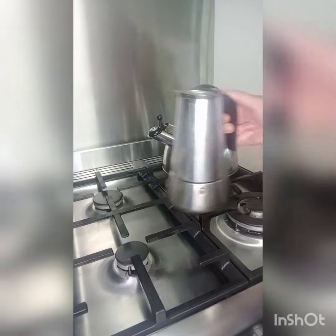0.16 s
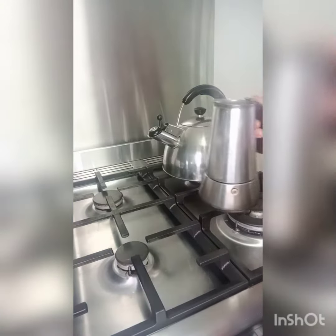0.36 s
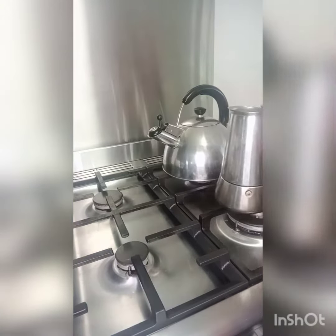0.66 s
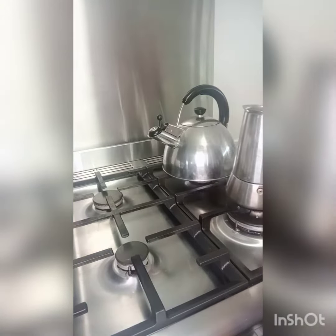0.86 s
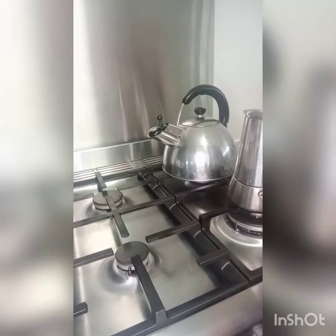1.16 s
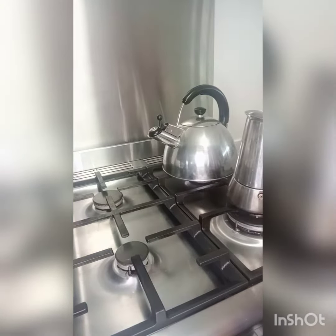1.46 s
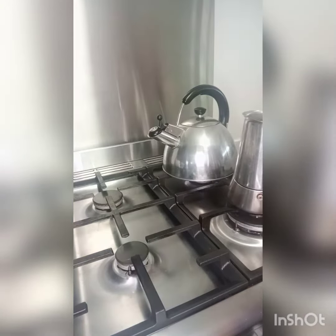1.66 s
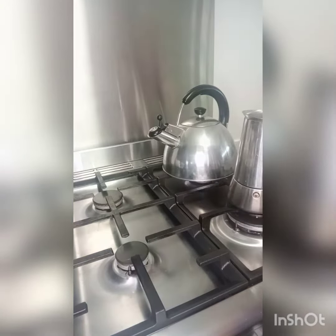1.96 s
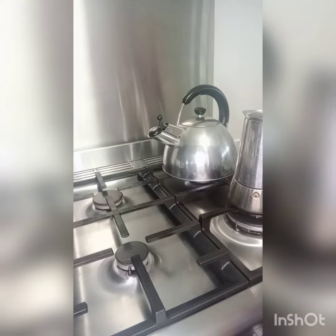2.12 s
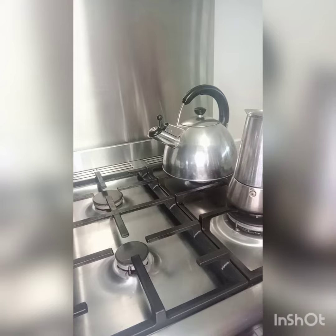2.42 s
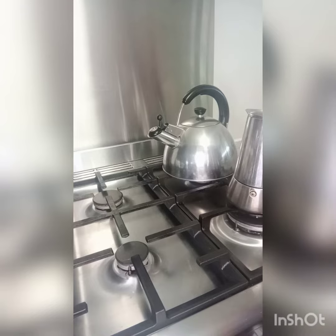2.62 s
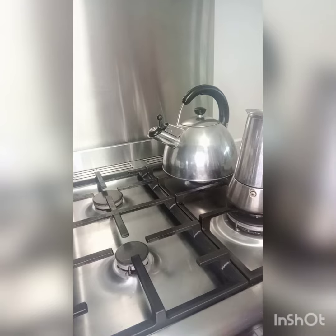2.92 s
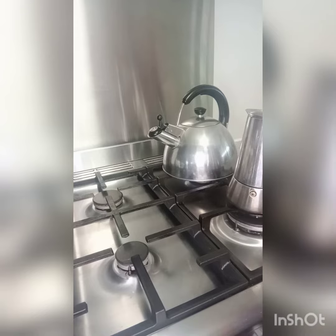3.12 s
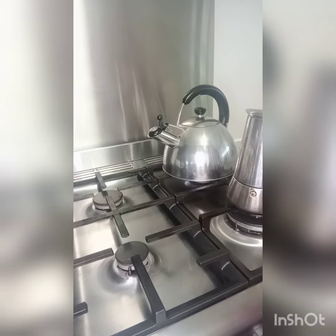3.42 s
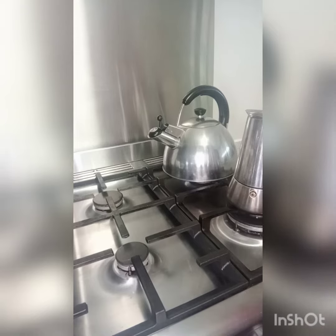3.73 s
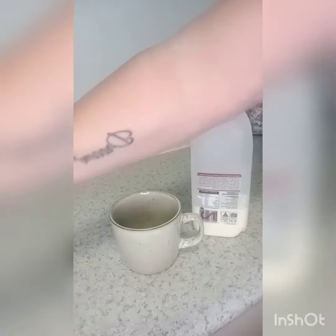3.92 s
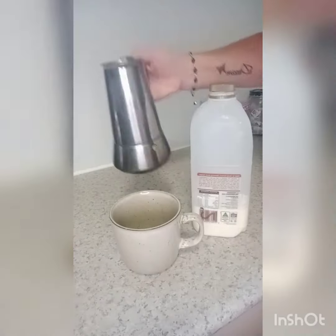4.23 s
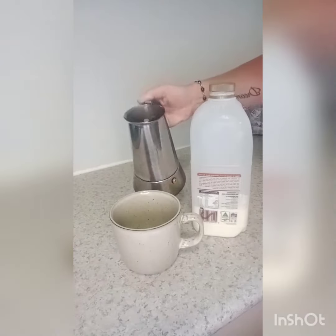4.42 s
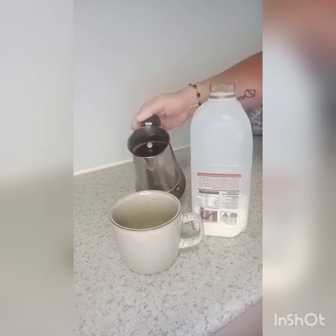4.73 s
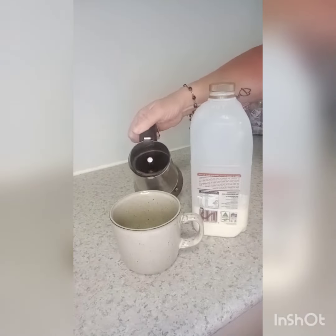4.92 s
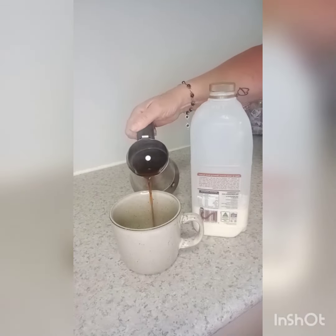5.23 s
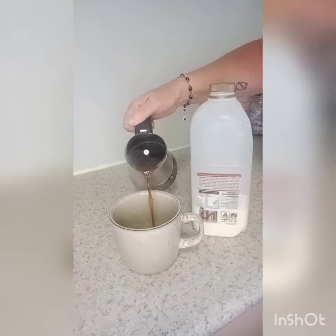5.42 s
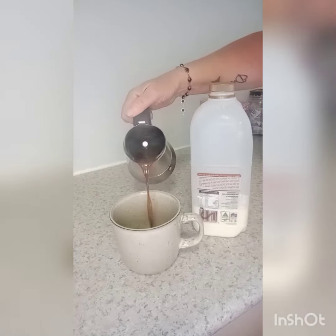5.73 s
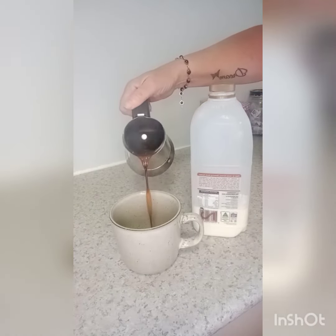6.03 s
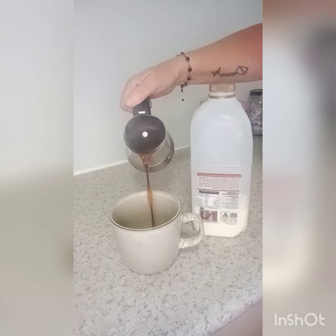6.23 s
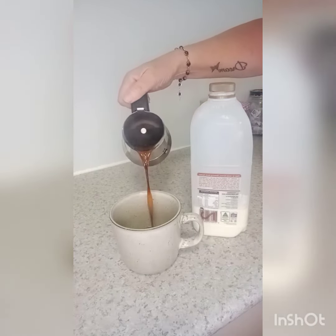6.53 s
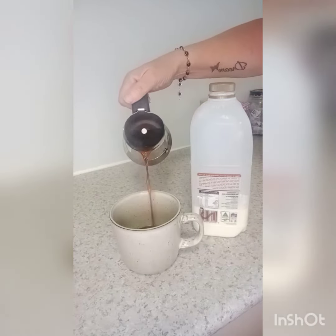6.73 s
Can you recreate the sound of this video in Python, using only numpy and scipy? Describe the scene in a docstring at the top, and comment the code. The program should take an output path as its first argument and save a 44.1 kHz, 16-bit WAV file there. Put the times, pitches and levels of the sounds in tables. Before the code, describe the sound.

From the start, a steel stovetop coffee pot gurgles and sputters close by, spitting several times a second over fine fizzing and low, hollow gulps. Its base knocks lightly on the stove grate several times in the first two seconds, with a short ringing clank near 0.9 seconds. At about 3.75 seconds the sound drops out for an instant, then the pot lifts off with a knock and a brief metallic scrape. The boiling collapses, leaving weak sputters and a couple of very faint tinkles until about 5.2 seconds. At 5.3 seconds a thin stream of coffee patters onto the bottom of a ceramic mug. From around 5.8 seconds it turns into louder, rounded plops and bubbling with small drip ticks, sinking slightly in pitch, and stops near 6.8 seconds. A faint hiss runs underneath, with the short echo of a small kitchen.

```python
"""Moka pot brewing and pouring

Steam spits through the coffee in the top of a steel moka pot while the boiler gulps below.
The pot knocks on the stove grate, then is lifted and carried, still sputtering, to a ceramic mug.
A thin stream patters on the bare bottom, then plops into the rising coffee. Most sounds start as
clicks that ring bubbles, trapped air, steel or the mug. A faint hiss runs underneath."""
import sys
import numpy as np
from scipy import signal
from scipy.fft import rfft, irfft, next_fast_len
from scipy.io import wavfile
from scipy.ndimage import uniform_filter1d

SR = 44100
rng = np.random.default_rng(int(sys.argv[2]) if len(sys.argv) > 2 else 0)


def master(y):
    """Save y as 16-bit WAV."""
    cut = np.clip(np.atleast_2d(y).T, -1, 1)
    pcm = np.round(cut * 32767)  # scale
    wavfile.write(sys.argv[1], SR, pcm.astype(np.int16))


N = 302967
TIME = np.arange(N) / SR
BURST_SIZE = SR // 4   # samples set aside for one short sound

# The tones at which things ring. Each row: pitch in Hz, width in Hz, relative level in dB.
# A narrower tone rings for longer.
CHAMBER_TONES = [(724, 144, -13.5), (853, 37, -3), (976, 213, -8.5), (1199.7, 46, 1.5), (1244, 31, 8),
                 (1322, 50, 3), (1461, 36, -0.5), (1684, 84, 0.5), (1833, 62, 0), (2115, 110, -1.5),
                 (2296, 68, -1.5), (2522, 100, -4)]   # air in the top of the pot
BOILER_TONES = [(127.8, 23, -1), (262, 52.3, 4.5), (312.6, 64, 0.5), (390.6, 45, 0.5), (541, 82, -6.5),
                (827, 63, -3.5)]   # the boiler and its funnel
STEEL_TONES = [(2440, 340, 20.5), (2780, 43, -1.5), (3650, 37, 10), (4070, 18, 2.5), (5070, 9, -5),
               (5800, 83, 9), (6640, 100, 1), (8660, 36, -4.5), (8100, 23000, -7.5)]   # the steel pot on the iron grate
MUG_AIR_TONES = [(677, 270, -22), (775, 56, 0), (934, 62, 2.5), (953, 130, -5.5), (1263, 79, 3.5),
                 (1460, 66, -11)]   # air in the mug
MUG_WALL_TONES = [(1220, 69, -1), (2235, 160, 4), (2493, 107, 8.5), (2777, 60, 3.5), (3216, 150, -3),
                  (3910, 220, -6), (4800, 290, -8.5), (5680, 125, -5.5), (6480, 89, -11), (7220, 850, -11),
                  (10200, 1900, -16)]   # the mug's wall and the higher tones of its air


def amp(db):
    """Turn decibels into a number to multiply by."""
    return 10 ** (np.asarray(db) / 20)


def rms_one(x):
    """Scale a sound so its average level (rms) is 1."""
    return x / np.sqrt(np.mean(x ** 2) + 1e-20)


def at_level(sound, db, length):
    """Scale a sound so its first `length` seconds have this average level."""
    return amp(db) * sound / np.sqrt(np.mean(sound[:max(int(length * SR), 64)] ** 2) + 1e-20)


def steady(x, window_s):
    """Even out slow swells but keep the fine crackle."""
    power = uniform_filter1d(x ** 2, max(int(window_s * SR), 64))
    return x / np.sqrt(np.abs(power) + 1e-20)


def curve(points, at=TIME):
    """Join (time, value) points with straight lines."""
    return np.interp(at, *np.transpose(points))


def wander(per_s):
    """A curve that drifts to a new random value per_s times a second."""
    values = rng.standard_normal(1000)
    return np.interp(TIME * per_s, np.arange(len(values)), values)


def add(out, s, sound):
    """Mix a sound in, starting at s seconds."""
    at = max(round(s * SR), 0)
    out[at:at + len(sound)] += sound[:N - at]


def shaped_noise(spectrum):
    """Noise whose balance of low and high follows (Hz, dB) points."""
    hz, db = np.transpose(spectrum)
    size = next_fast_len(N)
    bin_hz = np.arange(size // 2 + 1) * SR / size + 1
    gain = amp(np.interp(np.log(bin_hz), np.log(hz), db))
    return rms_one(irfft(rfft(rng.standard_normal(N), size) * gain, size)[:N])


def resonate(x, hz, width):
    """Let a sound ring at one pitch; width is in Hz."""
    r = np.exp(-np.pi * width / SR)
    feedback = [1, -2 * r * np.cos(2 * np.pi * hz / SR), r * r]
    return signal.lfilter(np.array([1, 0, -1]) * (1 - r * r) / 2, feedback, x + 1e-18)


def body(x, tones):
    """Ring all the tones of an object, flipping every second one upside down."""
    return sum((-1) ** k * amp(db) * resonate(x, hz, width) for k, (hz, width, db) in enumerate(tones))


def muffle(x, edge_hz, order):
    """Soften everything above edge_hz; a higher order cuts more steeply."""
    return signal.sosfilt(signal.butter(order, edge_hz, fs=SR, output="sos"), x)


def cut_lows(x, edge_hz):
    """Soften everything below edge_hz."""
    return signal.sosfilt(signal.butter(2, edge_hz, "high", fs=SR, output="sos"), x)


def pops(size, per_s, spread_db):
    """Random clicks; a few stand out as louder (positive spread) or softer (negative)."""
    strength = amp(spread_db * np.minimum(rng.exponential(1, size), 4))
    return (rng.random(size) < per_s / SR) * strength * rng.choice([-1, 1], size)


def cluster(length, per_s, first, tail_s):
    """One click of strength `first`, a flurry for `length` seconds, then fading stragglers."""
    t = np.arange(BURST_SIZE) / SR
    clicks = pops(BURST_SIZE, per_s, spread_db=-5) * np.exp(-np.maximum(t - length, 0) / tail_s)
    clicks[0] = first
    return clicks


def bubbles(clicks, hz, scatter, q, rise):
    """Each click frees a bubble that rings for about q cycles; `rise` lifts its pitch as it surfaces."""
    at = np.flatnonzero(np.abs(clicks) > amp(-40))
    pitch = (hz * np.exp(scatter * np.clip(rng.standard_normal(len(clicks)), -2, 2)))[at, None]
    age = np.arange(int(5.8 * q * SR / np.median(pitch)))
    decay = np.pi * pitch / q * age / SR
    fade_out = 1 - (age / len(age)) ** 2
    rings = clicks[at, None] * np.exp(-decay) * np.sin(2 * q * decay * (1 + rise * decay)) * fade_out
    return np.bincount((at[:, None] + age).ravel(), rings.ravel(), len(clicks))[:len(clicks)]


def fizz(tones, per_s, spread_db, patchy_db):
    """Fine crackle that favours now one tone, now another."""
    shared, out = pops(N, per_s, spread_db), np.zeros(N)
    for hz, width, db in tones:
        gain = amp(db + patchy_db * wander(per_s=28))
        out += gain * resonate(shared + pops(N, per_s, spread_db), hz, width)
    return rms_one(out)


def jets():
    """List every spit of the pot: strong jets, smaller spits between them and late sputters."""
    # Steam jets. Each row: time in seconds, relative level in dB, length in seconds,
    # bubble pitch in Hz, swell time in seconds.
    strong_jets = [(.042, -31.5, 0.0078, 1310, 0.00083), (.11, -28, 0.0088, 1270, 0.0051),
                   (.278, -31, 0.02, 1320, 0.0013), (.339, -31.5, 0.0039, 1610, 0.0022),
                   (.368, -32, 0.0094, 1710, 0.0018), (.435, -39.5, 0.043, 1500, .003),
                   (.486, -26, .013, 1580, 0.0097), (.571, -34.5, 0.0041, 1600, 0.0015),
                   (.642, -33, 0.037, 1510, 0.0028), (.711, -29, 0.0098, 1270, .001),
                   (.804, -34.5, 0.0054, 1650, 0.0055), (.906, -36, 0.049, 1470, 0.0011),
                   (1.032, -31.5, 0.023, 1550, 0.00092), (1.137, -34.5, 0.012, 1440, 0.0012),
                   (1.362, -34, 0.039, 1550, 0.017), (1.459, -31.5, 0.012, 1640, 0.0067),
                   (1.524, -30.5, 0.022, 1490, .003), (1.658, -34.5, 0.033, 1630, 0.0026),
                   (1.691, -34, 0.036, 1550, .01), (1.734, -28.5, .017, 1460, 0.0018),
                   (1.852, -27, 0.012, 1276, .001), (1.965, -32.5, 0.0098, 1290, 0.0023),
                   (2.014, -30, 0.018, 1370, 0.0041), (2.09, -31.5, .0043, 1270, 0.015),
                   (2.179, -30, 0.015, 1304, 0.0023), (2.244, -34, .017, 1450, 0.018),
                   (2.312, -33, 0.037, 1500, 0.0011), (2.356, -29.5, 0.0062, 1400, 0.023),
                   (2.439, -25, 0.018, 1330, 0.0012), (2.497, -35, 0.072, 1430, .003),
                   (2.599, -30.5, 0.045, 1620, 0.0047), (2.692, -26, 0.0045, 1320, .009),
                   (2.968, -31.5, 0.019, 1510, 0.0065), (3.009, -33.5, 0.022, 1450, .003),
                   (3.125, -32, 0.0059, 1300, 0.0076), (3.203, -35, 0.0037, 1700, 0.00083),
                   (3.259, -31.5, 0.0026, 1320, 0.0007), (3.296, -30, 0.0025, 1290, .004),
                   (3.383, -36, 0.038, 1540, 0.0028), (3.614, -35, 0.022, 1710, 0.0011),
                   (3.709, -38, 0.0069, 1650, 0.0023)]
    # Smaller spits between jets, all with one common length, pitch and swell. Each row: time in seconds,
    # relative level in dB.
    blips = [(0.012, -35.5), (.075, -43), (.169, -41.5), (.215, -37.5), (0.605, -40), (.833, -42),
             (1.23, -40), (1.264, -52), (1.403, -51), (1.764, -40), (1.882, -37.5), (1.935, -36),
             (2.42, -36), (2.782, -34), (2.811, -44), (2.876, -37), (2.936, -37.5), (3.08, -36.5),
             (3.426, -36), (3.465, -44), (3.525, -41), (3.664, -35)]
    # The last steam, off the heat. Each row: time in seconds, relative level in dB, length in seconds.
    sputters = [(3.93, -41, 0.0042), (4.011, -63.5, .02), (4.141, -47.5, 0.03), (4.2, -57.5, 0.033),
                (4.238, -53, 0.0066), (4.382, -58.5, 0.018), (4.507, -55.5, 0.028), (4.627, -56.5, 0.044),
                (4.681, -50, .036), (4.775, -64, 0.0063), (4.865, -66, .005), (4.918, -52.5, .007),
                (4.943, -63.5, 0.0041), (5.007, -48, 0.02), (5.103, -54, 0.019), (5.158, -54, 0.015)]
    # Sputters sink in pitch as the pot tilts. Each row: time in seconds, pitch in Hz.
    sputter_pitch = [(4.68, 1540), (4.92, 1204)]
    rows = list(strong_jets) + [(s, db, 0.0094, 1537, 0.0019) for s, db in blips]
    return rows + [(s, db, length, curve(sputter_pitch, s), length / 2) for s, db, length in sputters]


def hiss():
    """A faint, wavering hiss, louder at the stove."""
    # Each row: time in seconds, relative level in dB.
    hiss_levels = [(0, -65), (3.7, -67), (3.95, -68), (4.06, -74.5), (4.16, -63), (4.25, -69), (4.32, -72),
                   (4.6, -70), (4.72, -70), (4.82, -75), (5.05, -68.5), (5.3, -70), (5.5, -69),
                   (6.87, -70.5)]
    # Each row: frequency in Hz, relative level in dB.
    hiss_spectrum = [(30, 1.5), (120, 19), (300, 7), (700, 5.5), (1500, -2.5), (3000, -3.5), (5500, -6.5),
                     (7000, -9.5), (10500, -5), (12000, -11), (13800, -0.5), (14600, -2), (15500, 1.5)]
    return amp(1 + 1.5 * wander(per_s=13)) * amp(curve(hiss_levels)) * shaped_noise(hiss_spectrum)


def simmer(spitting):
    """Small bubbles keep bursting in the froth and the boiler; each spit stirs up the froth."""
    # The boil collapses off the stove. Each row: time in seconds, strength in dB.
    boil_strength = [(0, 6), (3.74, 3.5), (3.9, -36), (5.4, -22)]
    boil_db = curve(boil_strength)
    froth_gain = amp(-47.5 + boil_db + 3 * wander(per_s=30))
    boiler_gain = amp(-59.5 + 0.58 * boil_db)
    settle = np.exp(-1 / (0.0069 * SR))
    stirred = np.sqrt(signal.lfilter([1 - settle], [1, -settle], spitting ** 2))
    froth = bubbles(pops(N, per_s=800, spread_db=4.5), hz=1717, scatter=0.33, q=6.4, rise=0)
    froth = steady(muffle(body(froth, CHAMBER_TONES), edge_hz=2130, order=6), window_s=0.023)
    boil = bubbles(pops(N, per_s=130, spread_db=7), hz=236, scatter=0.47, q=1.3, rise=0)
    boil = steady(body(boil, BOILER_TONES), window_s=0.15)
    return np.hypot(froth_gain, amp(-28.5) * stirred) * froth + boiler_gain * boil


def lull():
    """A volume curve that quiets the simmer while pressure builds before each spit."""
    gain = np.ones(N)
    for s, _, _, _, swell in jets():
        gain[(TIME > s - swell - 0.022) & (TIME < s - swell)] = amp(-8)
    return uniform_filter1d(gain, size=90)


def spits():
    """Each steam jet bursts one big bubble and a flurry of small ones that ring the top of the pot."""
    out, t = np.zeros(N), np.arange(BURST_SIZE) / SR
    for s, db, length, hz, swell in jets():
        top_hz = min(1.414 * hz * 2 ** ((db + 37) / 90), 2550)   # big bubbles and weak jets sound dull
        shape = np.minimum((t + 0.00061) / swell, 1) * amp(-4 * np.clip((t - swell) / length, 0, 1))
        clicks = cluster(swell + 0.75 * length, per_s=920, first=0.9, tail_s=0.004) * shape
        flurry = bubbles(clicks, hz, scatter=0.15, q=2, rise=0)
        slosh = np.exp(0.008 * np.clip(rng.standard_normal(), -2, 2))   # moving coffee retunes the air
        ringing = body(flurry, [(tone * slosh, width, level) for tone, width, level in CHAMBER_TONES])
        escaping = amp(-24) * resonate(flurry, hz, width=1400)
        sound = muffle(ringing + escaping, top_hz, order=6)
        add(out, s - swell + 0.001021, at_level(sound, db - 6.5, swell + length))
        # The big bubble is heard straight from the spout; a slow swell softens it.
        pop = resonate(resonate(signal.unit_impulse(BURST_SIZE), hz, width=226), hz, width=430)
        pop = at_level(muffle(pop, top_hz, order=6), db - 0.5, length=0.004)
        add(out, s - 0.001, pop / (1 + (swell / 0.017) ** 2))
    return out


def spray(coffee):
    """Small bursting bubbles throw a fine mist that fizzes and rings in step with them."""
    # Tones of the mist. Each row: pitch in Hz, width in Hz, relative level in dB.
    mist_tones = [(2794, 235, 0), (3000, 240, -21), (3900, 82, 2.5), (4630, 590, -10), (8330, 1200, -10)]
    small_bursts = amp(10) * resonate(coffee, hz=2130, width=710)
    strength = np.sqrt(np.abs(uniform_filter1d(small_bursts ** 2, size=700)))
    tiny = bubbles(pops(N, per_s=100, spread_db=-6), hz=3813, scatter=0.13, q=75, rise=0.0016)
    mist = fizz(mist_tones, per_s=3100, spread_db=2.5, patchy_db=9.5)
    return strength * (amp(-33) * mist + amp(-40.5) * rms_one(tiny))


def gulps():
    """Water surges up the funnel and booms in the boiler, under every spit and sometimes alone."""
    # Surges between jets. Each row: time in seconds, relative level in dB, length in seconds.
    lone_gulps = [(0.208, -43.5, 0.0043), (0.599, -42, 0.063), (1.087, -38.5, 0.0043), (1.242, -41, 0.019),
                  (1.625, -45.5, 0.06), (2.219, -37.5, 0.01), (2.532, -44.5, 0.017), (2.809, -44, 0.0052),
                  (3.084, -40, 0.0081), (3.466, -38.5, 0.0024), (3.544, -44.5, 0.04), (3.644, -48, 0.017)]
    typical_spit_db = -23.5
    spit_gulps = [(s, -42 + 0.72 * (db - typical_spit_db), length) for s, db, length, _, _ in jets()]
    out = np.zeros(N)
    for s, db, length in spit_gulps + list(lone_gulps):
        hz = 292 * np.exp(0.042 * rng.standard_normal())
        surge = resonate(cluster(length, per_s=750, first=1.4, tail_s=0.003), hz, width=500)
        boom = muffle(body(surge, BOILER_TONES), edge_hz=1170, order=4)
        add(out, s - 0.004, at_level(boom, db - 1, length + 0.013))
    return out


def knocks():
    """The steel base chatters on the grate: the pot rings and the stove thuds."""
    # Each row: start in seconds, ring level in dB, thud level in dB, length in seconds,
    # brightness in Hz.
    contacts = [(0.368, -56, -54, 0.0056, 3780), (0.615, -48.5, -42.5, 0.015, 3100),
                (0.643, -54.5, -66, 0.0038, 8800), (0.932, -49.5, -36.5, 0.034, 3600),
                (1.178, -50.5, -38, 0.0055, 3020), (1.736, -51, -48.5, 0.011, 3500),
                (3.826, -73, -52, 0.06, 4960), (3.877, -68, -46, 0.013, 4030),
                (3.896, -51, -40.5, 0.0041, 6400)]
    # Tones of the stove. Each row: pitch in Hz, width in Hz, relative level in dB.
    stove_tones = [(71, 47, -2.5), (107.6, 20, 9.5), (141.5, 28, 7.5), (227, 42, 4.5), (370, 140, -1.5),
                   (744, 170, -2.5), (1410, 300, 3.5)]
    out = np.zeros(N)
    for s, ring_db, thud_db, length, hz in contacts:
        chatter = cluster(length, per_s=1100, first=1.8, tail_s=0.017)
        ring = body(resonate(chatter, hz, width=1300), STEEL_TONES)
        thud = muffle(body(chatter, stove_tones), edge_hz=1630, order=2)
        add(out, s, at_level(ring, ring_db, length))
        add(out, s, at_level(thud, thud_db, length + 0.0033))
    return out


def clanks():
    """The pot lands squarely on the grate with a short crack, and its wall rings."""
    # Each row: start in seconds, level in dB.
    blows = [(0.93, -45.5), (0.951, -55)]
    # Tones of the steel wall. Each row: pitch in Hz, relative level in dB, seconds to fade by 60 dB.
    wall_tones = [(3310, -9, 0.11), (3740, 2, 0.19), (4240, 0, 0.14), (4530, -1, 0.07), (4797, 0, 0.11),
                  (5010, -4, 0.11), (5600, -16, 0.2), (6000, -13, 0.081)]
    out, t = np.zeros(N), np.arange(SR // 2) / SR
    for s, db in blows:
        ring = sum(amp(level - 60 * t / fade_s) * np.sin(2 * np.pi * hz * t) * rng.choice([-1, 1])
                   for hz, level, fade_s in wall_tones)
        noise = resonate(rng.standard_normal(len(t)), hz=4500, width=1100)
        crack = rms_one(resonate(noise, hz=4700, width=1700)) * np.exp(-t / 0.011)
        add(out, s, at_level(ring + amp(3) * crack, db, length=0.008))
    return out


def whistles():
    """Thin, high bands of hiss swell, rise a little in pitch and fade."""
    # Each row: start in seconds, length in seconds, top level in dB, first and last pitch in Hz.
    glides = [(2.553, 1.1, -79, 12400, 13700), (4.6, 0.75, -79, 10660, 10700)]
    out = np.zeros(N)
    for s, length, db, first_hz, last_hz in glides:
        progress = np.clip((TIME - s) / length, 0, 1)
        phase = 2 * np.pi * np.cumsum(first_hz + (last_hz - first_hz) * progress) / SR
        waver = muffle(rng.standard_normal((2, N)), edge_hz=250, order=2)
        band = rms_one(waver[0] * np.cos(phase) + waver[1] * np.sin(phase))
        out += amp(db) * np.sin(np.pi * progress) * band
    return out


def scrapes():
    """The base drags off the grate as the pot is lifted: many tiny slips ring the steel."""
    # Each row: start in seconds, level in dB, length in seconds, brightness in Hz.
    drags = [(3.862, -55, 0.056, 6530), (3.918, -59.5, 0.027, 9100)]
    out, t = np.zeros(N), np.arange(BURST_SIZE) / SR
    for s, db, length, hz in drags:
        stroke = np.sin(np.pi * np.minimum(t / length, 1))
        slips = resonate(pops(BURST_SIZE, per_s=2000, spread_db=1) * stroke, hz, width=4700)
        add(out, s, at_level(body(slips, STEEL_TONES), db, length))
    return out


def tinkles():
    """Small metal parts touch and ring faintly while the pot is carried."""
    # Each row: start in seconds, peak level in dB, pitch in Hz.
    touches = [(4.032, -69, 5800), (4.52, -73, 5290)]
    out, t = np.zeros(N), np.arange(BURST_SIZE) / SR
    for s, db, hz in touches:
        add(out, s, amp(db) * np.exp(-t / 0.025) * np.sin(2 * np.pi * hz * t))
    return out


def churning():
    """The stream pulls air under in short, uneven gulps, making bubbles in the mug."""
    # Bubbles grow and sound lower as the mug fills. Each row: time in seconds, pitch in Hz.
    bubble_pitch = [(5.4, 1270), (5.78, 1334), (5.95, 970), (6.2, 912), (6.5, 764), (6.8, 657)]
    pitch = curve(bubble_pitch)
    churn = bubbles(pops(N, per_s=450, spread_db=-1), pitch, scatter=0.44, q=2.8, rise=0.002)
    churn = steady(muffle(body(churn, MUG_AIR_TONES), edge_hz=1320, order=4), window_s=0.056)
    glugs = bubbles(pops(N, per_s=250, spread_db=4.5), pitch, scatter=0.12, q=17, rise=0.0022)
    glugs = steady(resonate(resonate(glugs, hz=840, width=850), hz=810, width=1100), window_s=0.04)
    gulping = rms_one(amp(4.5 * np.tanh(2 * wander(per_s=110))))
    return gulping * (amp(-2) * churn + amp(-5) * glugs)


def stream():
    """The stream bubbles in the mug, splashes its wall and drums on its bottom; the foam sizzles."""
    # The flow from the spout, faltering at times. Each row: time in seconds, strength in dB.
    flow = [(5.32, -54), (5.345, 0), (5.55, 0.5), (5.585, -15), (5.63, -2.5), (5.71, -13), (5.735, -3),
            (5.87, 1), (6.02, -2), (6.5, 1), (6.65, -3.5), (6.81, -0.5), (6.85, -43)]
    # Tones of the mug on the counter. Each row: pitch in Hz, width in Hz, relative level in dB.
    base_tones = [(187, 106, -12.5), (305.5, 30, -4), (374, 88, -17.5)]
    churn = churning()
    ticks = rms_one(body(pops(N, per_s=45, spread_db=2.5), MUG_WALL_TONES))
    foam = resonate(pops(N, per_s=6000, spread_db=1), hz=14900, width=1500)
    foam = rms_one(resonate(foam, hz=15000, width=2300))
    patter = steady(fizz(MUG_WALL_TONES, per_s=2200, spread_db=4.5, patchy_db=10.5), window_s=0.087)
    droplets = bubbles(pops(N, per_s=1300, spread_db=1.5), hz=3434, scatter=0.36, q=64, rise=0.0026)
    droplets = cut_lows(steady(droplets, window_s=0.089), edge_hz=1200)
    drum = rms_one(muffle(body(pops(N, per_s=390, spread_db=4), base_tones), edge_hz=530, order=2))
    # Bubbling grows until a pool covers the bottom; drumming keeps growing as the mug fills.
    pool_s, drum_rise_db_per_s = 0.56, 12
    pouring_s = np.maximum(TIME - flow[0][0], 0)
    bare_share = np.maximum(1 - pouring_s / pool_s, 0)
    bubbling = amp(-46.5 - 23.5 * bare_share) * (churn + amp(-21) * foam)
    splash = amp(-61.5) * patter + amp(-66) * droplets + amp(-68) * ticks
    drumming = amp(-72.5 + drum_rise_db_per_s * pouring_s) * drum
    return amp(curve(flow)) * (bubbling + splash + drumming)


def drops():
    """The loudest drops tick against the mug and leave tiny bubbles ringing."""
    # Each row: start in seconds, level in dB, length in seconds, pitch in Hz.
    hits = [(5.333, -50.5, 0.0024, 3500), (5.43, -48, 0.0067, 3900), (5.468, -62, 0.015, 1290),
            (5.525, -46.5, 0.0043, 4840), (5.544, -59, 0.019, 3460), (5.61, -58, 0.012, 3830),
            (5.82, -56, .004, 2200), (5.849, -55, 0.0045, 2860), (5.961, -59, 0.0063, 3880),
            (6.06, -53.5, 0.0026, 7800), (6.104, -54, .004, 2720), (6.174, -56, 0.0033, 3600),
            (6.353, -56, 0.014, 6750), (6.454, -56.5, .003, 2600), (6.475, -56, 0.0069, 5500),
            (6.545, -56, .003, 2700), (6.656, -53, 0.0065, 4000), (6.723, -50.5, 0.0098, 2770),
            (6.746, -55, .004, 3560), (6.787, -55, 0.019, 3650)]
    out = np.zeros(N)
    for s, db, length, hz in hits:
        clicks = cluster(length, per_s=1500, first=0.56, tail_s=0.003)
        tick = bubbles(clicks, hz, scatter=0.11, q=4.7, rise=0.0054)
        add(out, s, at_level(body(resonate(tick, hz, width=hz), MUG_WALL_TONES), db, length))
    return out


def plops():
    """Big air pockets pulled under by the stream ring, and the air in the mug rings with them."""
    # Each row: time in seconds, opening level in dB, pitch in Hz.
    pockets = [(5.801, -45, 830), (5.871, -40, 1150), (5.902, -36.5, 926), (5.961, -38.5, 820),
               (6.037, -29, 833), (6.062, -30.5, 814), (6.106, -41, 900), (6.117, -33.5, 790),
               (6.166, -45, 850), (6.21, -42, 840), (6.279, -39, 840), (6.352, -41, 860), (6.503, -44, 875),
               (6.661, -48, 700), (6.135, -38.5, 810), (6.198, -34.5, 824), (6.246, -29.5, 820),
               (6.266, -39, 833), (6.339, -32.5, 808), (6.455, -30.5, 776), (6.479, -39.5, 844),
               (6.546, -28, 802), (6.583, -41.5, 730), (6.687, -42, 730), (6.71, -42, 710)]
    out, click = np.zeros(N), signal.unit_impulse(BURST_SIZE)
    for s, db, hz in pockets:
        bubble = muffle(resonate(resonate(click, hz, width=142), hz, width=138), edge_hz=1800, order=4)
        plop = bubble + amp(-8.5) * body(bubble, MUG_AIR_TONES)
        add(out, s - 0.0005, at_level(plop, db, length=0.003))
    return out


def kitchen(x, echo_db):
    """Add the short echo of close, hard walls."""
    t, fade_s = np.arange(SR // 2) / SR, 0.12
    tail = rng.standard_normal(len(t)) * amp(-60 * t / fade_s) * (t > 0.004)
    return x + amp(echo_db) * signal.fftconvolve(x, tail / np.linalg.norm(tail))[:N]


def scene():
    """Pot, mug and hiss sound in the middle, over a faint wide noise."""
    # All sound drops out briefly just before the pot is lifted. Each row: time in seconds, gain in dB.
    dropout = [(3.744, 0), (3.747, -50), (3.785, -50), (3.81, 0)]
    spitting = spits()
    coffee = spitting + lull() * simmer(spitting)
    pot = coffee + spray(coffee) + gulps() + knocks() + clanks() + scrapes() + tinkles()
    pot = kitchen(pot, echo_db=-6)
    mug = kitchen(stream() + plops() + drops(), echo_db=-7.5)
    middle = pot + mug + hiss()
    noise = amp(-82.5) * shaped_noise([(40, -19), (130, -7), (1500, -24), (4500, -17.5), (7000, -34.5)])
    wide_noise = noise * np.array([[1], [-1]])   # opposite in the left and right ear
    return (middle + whistles() + wide_noise) * amp(curve(dropout))


def record(dry):
    """Cut the deep bass and the very highest treble."""
    treble_cut = signal.ellip(12, 0.2, 80, 15700, fs=SR, output="sos")
    return signal.sosfilt(treble_cut, cut_lows(dry, edge_hz=55))


dry = scene()
out = record(dry)
master(out)
```